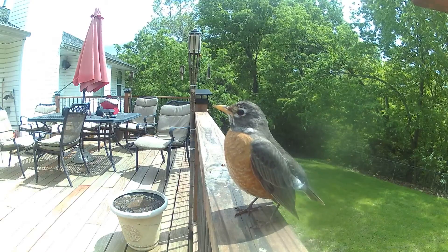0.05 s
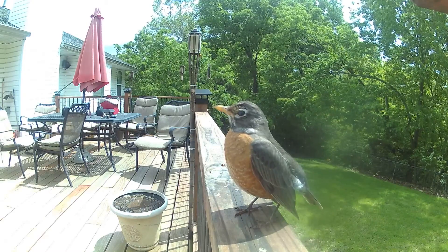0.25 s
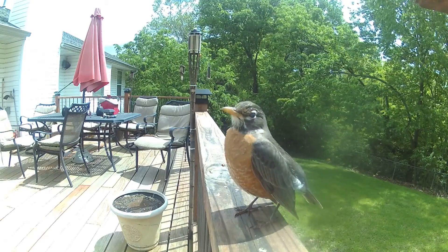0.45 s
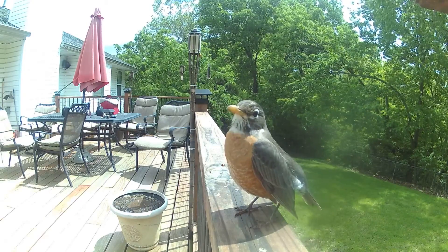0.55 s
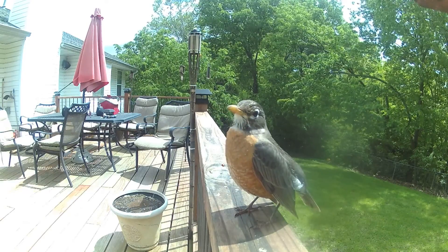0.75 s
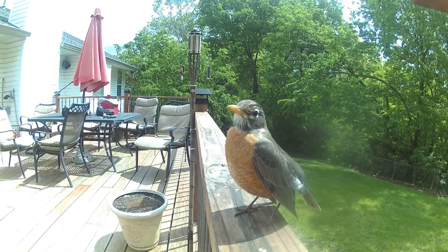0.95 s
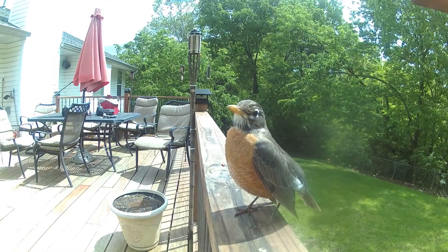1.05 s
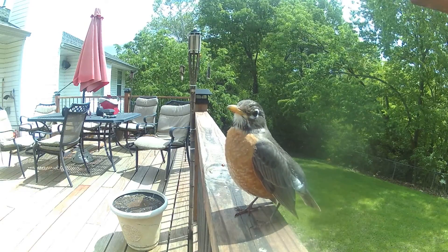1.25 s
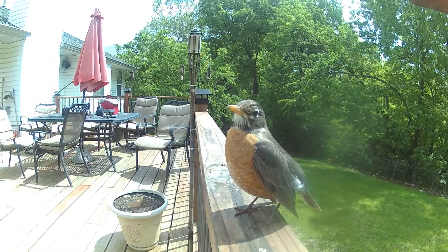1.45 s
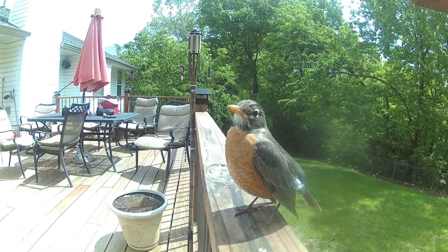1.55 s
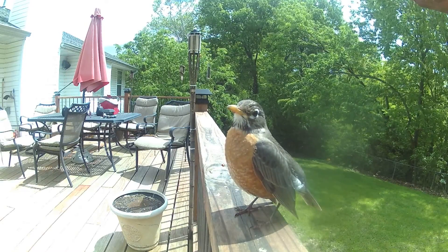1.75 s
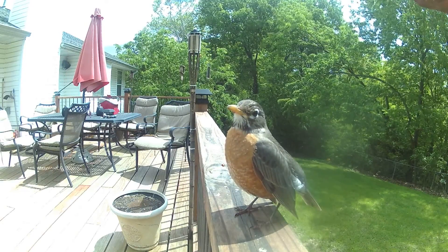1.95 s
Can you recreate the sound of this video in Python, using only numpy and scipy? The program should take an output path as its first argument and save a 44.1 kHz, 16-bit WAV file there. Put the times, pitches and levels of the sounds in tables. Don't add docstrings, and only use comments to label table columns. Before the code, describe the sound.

A robin close to the microphone gives three sharp, rich, downward chirps at about 0.24, 0.48 and 0.71 seconds, each under a tenth of a second, with a faint lower after-note near 0.8. Underneath, a distant cooling unit hums steadily and leaves hiss. Low wind flutters on the microphone, throbbing around 0.7 to 1.0, then eases until 2 seconds. Open yard, little echo.

```python
import sys
import numpy as np
from scipy import signal
from scipy.fft import rfft, irfft
from scipy.io import wavfile
from scipy.ndimage import uniform_filter1d

SR = 44100
rng = np.random.default_rng(int(sys.argv[2]) if len(sys.argv) > 2 else 0)


def makeup_ratio(level_db):
    decades = np.asarray(level_db, float) / 20
    return 10 ** decades


def transcribe(u):
    v = np.clip(np.atleast_2d(u).T, -1, 1)
    q = np.round(v * 32767).astype(np.int16)
    wavfile.write(sys.argv[1], SR, q)


N = 88200
TIME_S = np.arange(N) / SR


def level(x, db):
    return x * makeup_ratio(db) / np.sqrt(np.mean(x ** 2))


def walk(rate_hz):
    k = int(SR / rate_hz)
    return level(uniform_filter1d(uniform_filter1d(rng.standard_normal(N), k), k), 0)


def colour(x, gain):
    hz = np.arange(N // 2 + 1) * SR / N + 1
    return irfft(rfft(x) * gain(hz), N)


def voice(calls, level_column=2):
    waver, shimmer_db = .003, .4
    rows = np.concatenate([np.array(call, float) for call in calls])

    def glide(column):
        return uniform_filter1d(np.interp(TIME_S, rows[:, 0], rows[:, column]), size=130)

    sounding = sum((TIME_S >= call[0][0]) & (TIME_S <= call[-1][0]) for call in calls)
    gate = uniform_filter1d(sounding * 1., size=60)
    pitch_hz = glide(1) * (1 + waver * walk(290))
    phase = 2 * np.pi * np.cumsum(pitch_hz) / SR
    return phase, np.sqrt(2) * gate * makeup_ratio(glide(level_column) + shimmer_db * walk(230))


# centre in seconds, length in seconds, level in dB.
PUFFS = [
    (.27, .012, -78),
    (0.513, .017, -71.5),
]


def beak_air():
    air = colour(rng.standard_normal(N), lambda hz: np.exp(-((hz - 11500) / 4500) ** 2))
    puffs = sum(makeup_ratio(db) * np.exp(-((TIME_S - s) / span) ** 2) for s, span, db in PUFFS)
    return puffs * level(air, 0)


# time in seconds, pitch in Hz, level in dB.
UPPER_VOICE = [
    [(.2375, 2148, -52), (.242, 2605, -47), (.2475, 2965, -47), (.262, 2844, -45), (.274, 2566, -45),
     (.282, 1920, -35.5), (.293, 1397, -34.5), (.302, 1363, -34.5), (.309, 1340, -55)],
    [(.479, 2300, -56), (.4865, 2860, -47), (.493, 3070, -46.5), (.506, 2790, -44), (.517, 2490, -42.5),
     (.529, 1722, -38.5), (.539, 1380, -33.5), (.546, 1440, -36.5), (.554, 1300, -75)],
    [(.7095, 2162, -60), (.714, 2630, -48), (.7205, 3172, -53.5), (.738, 3190, -49.5), (.748, 3000, -47),
     (.758, 3090, -47.5), (.770, 2576, -40.5), (.775, 2256, -41), (.779, 2177, -68)],
    [(.789, 1913, -54), (.7925, 1580, -41.5), (.7965, 1443, -44.5), (.802, 1494, -40), (.808, 1450, -62)],
]
# time in seconds, pitch in Hz, level in dB, level of the difference tone in dB.
LOWER_VOICE = [
    [(.2375, 1249, -54, -57), (.241, 1628, -46, -48), (.246, 1745, -37, -50), (.251, 1752, -34.5, -42),
     (.266, 1541, -35, -36.5), (.274, 1320, -27.5, -41), (.279, 1177, -31, -55), (.285, 1170, -52, -47)],
    [(.4795, 1455, -44, -68), (.484, 1733, -43, -52), (.492, 1856, -34, -42), (.508, 1682, -31.5, -39),
     (.517, 1520, -31, -45), (.524, 1355, -26, -49), (.529, 1200, -27.5, -66), (.535, 1092, -65, -75)],
    [(.7125, 1878, -54, -73), (.717, 1975, -41, -45), (.722, 2088, -38, -41.5), (.734, 1921, -34.5, -48),
     (.750, 1870, -36, -39), (.754, 1736, -40, -39), (.758, 1540, -43, -58), (.761, 1443, -63, -68)],
]


def robin():
    octave_db, sum_db, side_db, overtone_db = 9, 7, 10, 4
    throat_top_hz = 3850
    up, up_amp = voice(UPPER_VOICE)
    low, low_amp = voice(LOWER_VOICE)
    diff_amp = voice(LOWER_VOICE, level_column=3)[1]
    whistles = up_amp * np.sin(up) + low_amp * np.sin(low)
    difference = diff_amp * np.sin(up - low)
    octaves = diff_amp * low_amp * np.sin(2 * low) + 0.47 * up_amp ** 2 * np.sin(2 * up)
    mixed = makeup_ratio(sum_db) * up_amp * low_amp * np.sin(up + low) + makeup_ratio(octave_db) * octaves
    mixed = mixed + makeup_ratio(side_db) * diff_amp * low_amp * np.sin(3 * low - up)
    mixed = colour(mixed, lambda hz: 1 / (1 + (hz / throat_top_hz) ** 20))
    overtone = colour(up_amp * low_amp * np.sin(4 * up), lambda hz: np.exp(-((hz - 12500) / 400) ** 2))
    return whistles + difference + mixed + beak_air() + makeup_ratio(overtone_db) * overtone


def yard(x):
    echo_s, echo_db, t60_s, tail_db = .0021, -28, .12, -25
    t = np.arange(int(.4 * SR)) / SR
    tail = rng.standard_normal(len(t)) * np.exp(-np.log(1000) * t / t60_s) * (t > .008)
    tail = tail / np.linalg.norm(tail)
    echo = np.roll(x, int(echo_s * SR))
    return x + makeup_ratio(echo_db) * echo + makeup_ratio(tail_db) * signal.fftconvolve(x, tail)[:N]


# time in seconds, level in dB.
GUST = [(0, -58.5), (.3, -62.5), (.66, -58.5), (.71, -63), (.8, -54), (.94, -56), (1.05, -55.5),
        (1.3, -63.5), (1.6, -62), (2, -67)]


def wind():
    top_hz, flutter_db = 58, 1.5
    gust_s, gust_db = np.array(GUST).T
    rumble = colour(rng.standard_normal(N),
                    lambda hz: hz ** 2 / (hz ** 2 + 17 ** 2) / (1 + (hz / top_hz) ** 3.1))
    swell = np.sqrt(uniform_filter1d(rumble ** 2, size=6000))
    rumble = rumble / (swell + .2 * rumble.std())
    return level(rumble, 0) * makeup_ratio(np.interp(TIME_S, gust_s, gust_db) + flutter_db * walk(12))


# start in seconds, length in seconds, first pitch in Hz, last pitch in Hz, level in dB.
EDDIES = [
    (0.678, .19, 24, 80, -47.5),
    (0.798, .1, 17, 30, -59),
    (0.872, .1, 28, 62.4, -50.5),
]


def eddies():
    out = np.zeros(N)
    for start_s, span_s, low_hz, high_hz, db in EDDIES:
        u = np.clip((TIME_S - start_s) / span_s, 0, 1)
        phase = 2 * np.pi * span_s * (low_hz * u + (high_hz - low_hz) * u ** 2 / 2)
        swell = np.sin(np.pi * np.sqrt(u)) * (u < 1)
        out += np.sqrt(2) * makeup_ratio(db + 1.37 * walk(25)) * swell * np.sin(phase)
    return out


# frequency in Hz, level in dB.
HISS = [(90, -1), (300, -9), (650, -11), (1300, -12.5), (2300, -24.5), (3600, -28), (8000, -39.5),
        (15600, -43)]
# frequency in Hz, width in Hz, gain in dB.
HOUSING = [(1300, 1260, 0), (2750, 370, 3.5), (3400, 540, -5), (4320, 1080, 3), (5300, 350, -4.5),
           (6280, 720, 3)]


def hiss_db(hz):
    tilt_hz, tilt_db = np.array(HISS).T
    tilt = np.interp(np.log(hz), np.log(tilt_hz), tilt_db)
    return tilt + sum(db * np.exp(-((hz - f) / width) ** 2) for f, width, db in HOUSING)


HUM_ORDERS = [(0, 5), (1, 1), (2, -1), (2, 0), (2, 1), (2, 2), (3, 0), (3, 1), (4, -1), (4, 1), (5, -1),
              (5, 0), (6, -1), (7, -2), (7, 1), (8, 1), (11, -1), (11, 0), (13, 0)]
HUM_DB = [-59.5, -66, -58.5, -52, -65, -73.5, -70.5, -70, -74.5, -66, -72.5, -63, -71, -76.5, -67.5, -75,
          -76, -78, -85]
# frequency in Hz, level in dB.
TONES = [
    (470, -61),
    (13081, -90.5),
    (13162, -90.5),
]


def cooler():
    fan_hz, motor_hz = 248.98, 57.95
    comb_db, scatter_db, wander_db = -64, 2.5, .6
    drift = 0.49 * walk(0.67)
    wander = [makeup_ratio(wander_db * walk(7.6)) for _ in range(4)]
    lines = [(m * fan_hz + n * motor_hz, db) for (m, n), db in zip(HUM_ORDERS, HUM_DB)] + TONES
    for m in range(3, 27):
        for n in range(-2, 2):
            if (m, n) not in HUM_ORDERS:
                f = m * fan_hz + n * motor_hz
                lines.append((f, comb_db + hiss_db(f) + scatter_db * rng.standard_normal()))
    out = np.zeros(N)
    for k, (f, db) in enumerate(lines):
        phase = 2 * np.pi * f * TIME_S + rng.uniform(0, 2 * np.pi) + drift * min(f, 3000) / 1000
        out += np.sqrt(2) * makeup_ratio(db) * wander[k % 4] * np.sin(phase)
    return out


def leaves():
    level_db, fade_db_per_s = -52.5, -0.43
    hiss = colour(rng.standard_normal(N), lambda hz: makeup_ratio(hiss_db(hz)) * hz ** 2 / (hz ** 2 + 60 ** 2))
    return level(hiss, level_db) * makeup_ratio(fade_db_per_s * (TIME_S - 1) + 0.42 * walk(2))


def scene():
    return (yard(robin()) + wind() + eddies() + cooler() + leaves())[None]


def top_cut(x):
    return signal.sosfilt(signal.butter(12, 15700, fs=SR, output="sos"), x)


def record(dry):
    return top_cut(dry)


dry = scene()
out = record(dry)
transcribe(out)
```